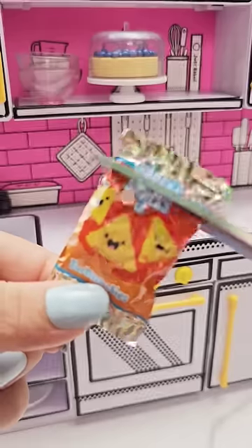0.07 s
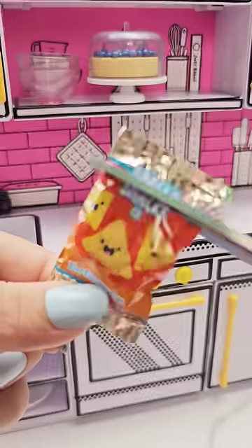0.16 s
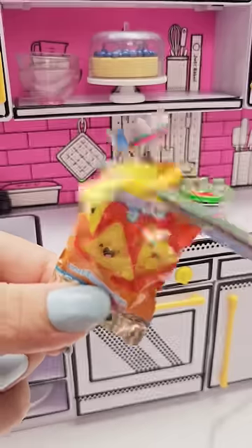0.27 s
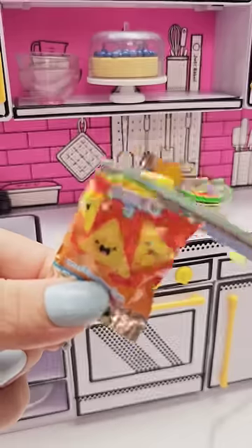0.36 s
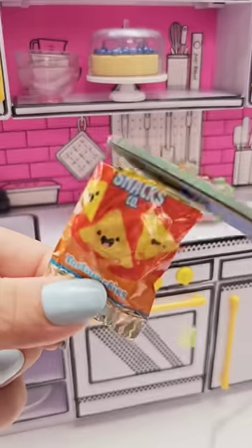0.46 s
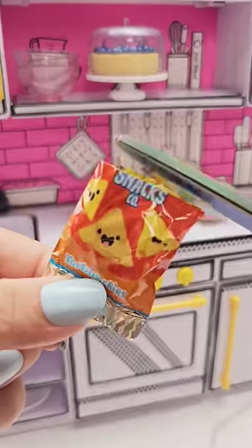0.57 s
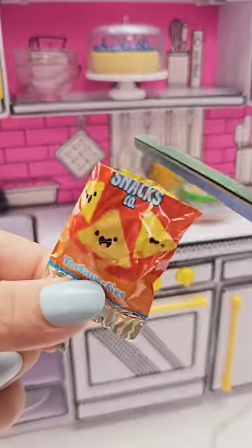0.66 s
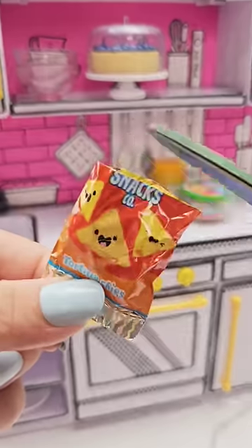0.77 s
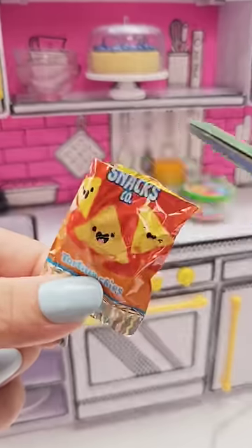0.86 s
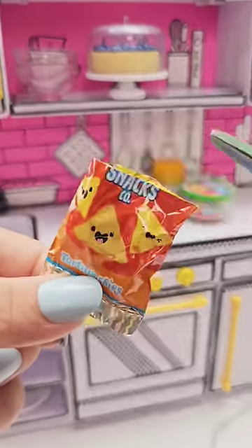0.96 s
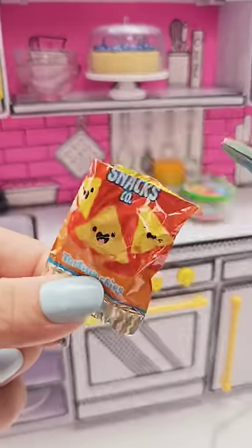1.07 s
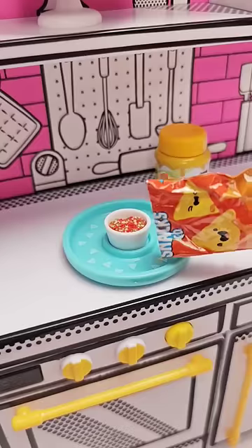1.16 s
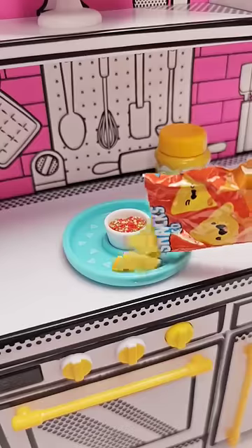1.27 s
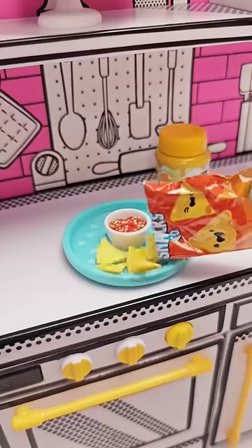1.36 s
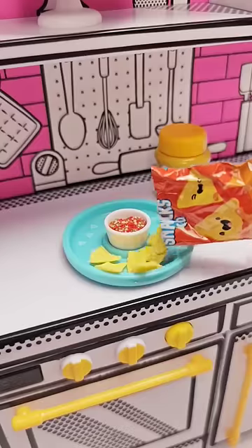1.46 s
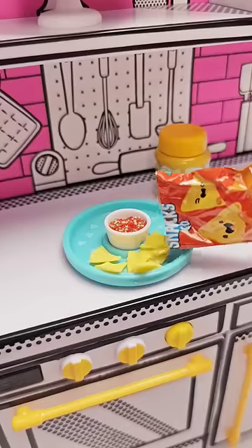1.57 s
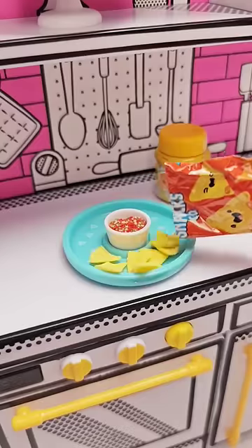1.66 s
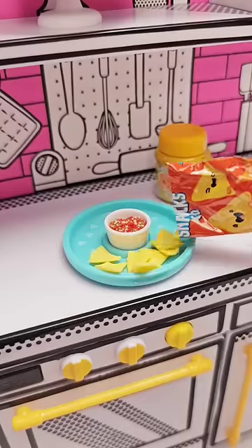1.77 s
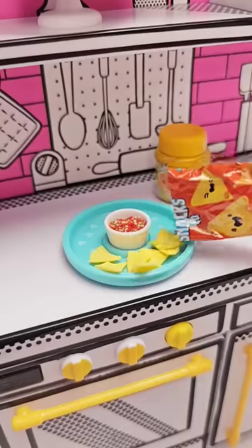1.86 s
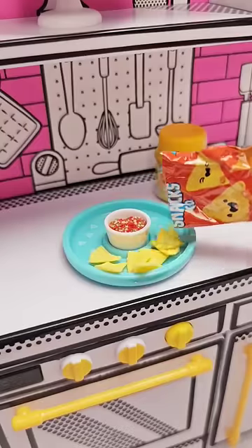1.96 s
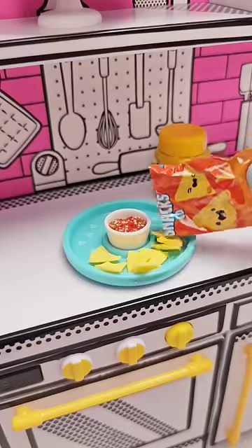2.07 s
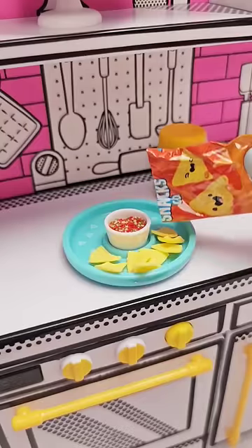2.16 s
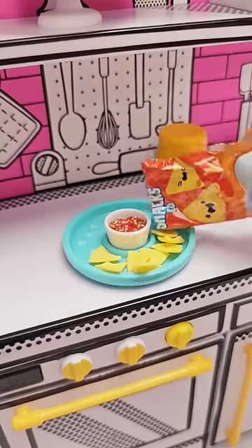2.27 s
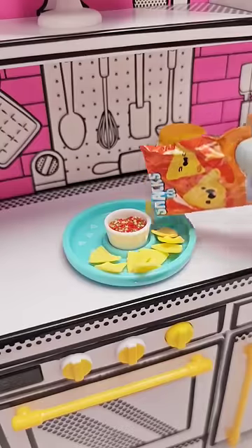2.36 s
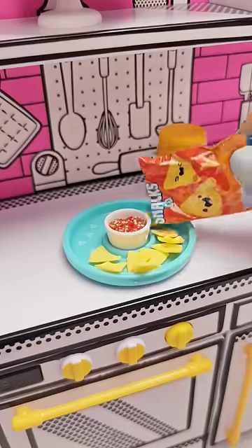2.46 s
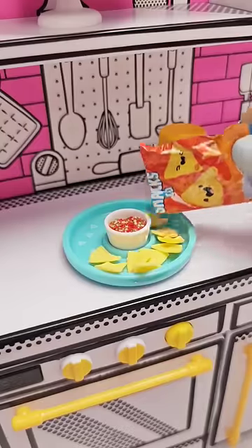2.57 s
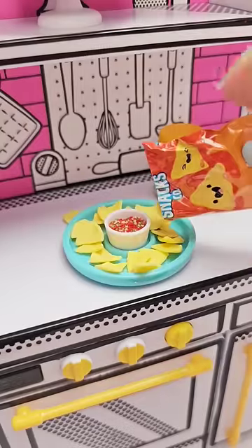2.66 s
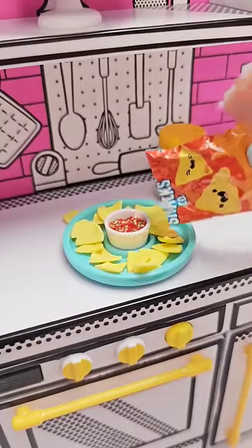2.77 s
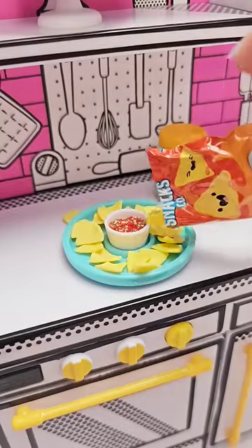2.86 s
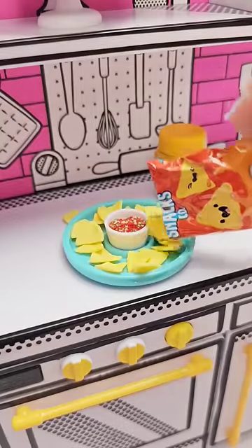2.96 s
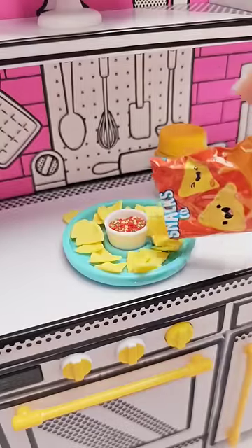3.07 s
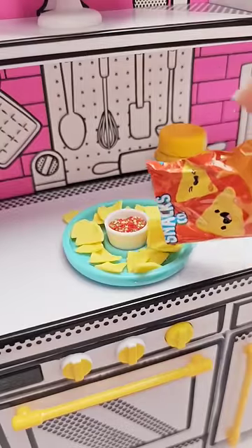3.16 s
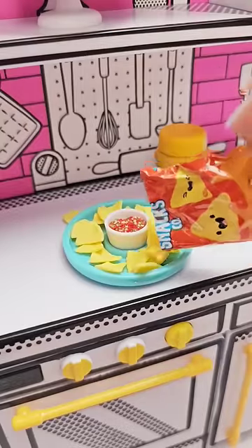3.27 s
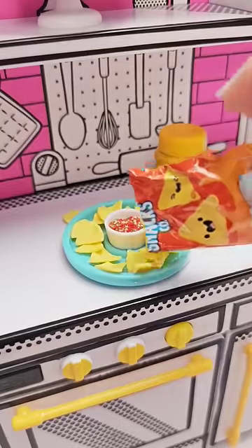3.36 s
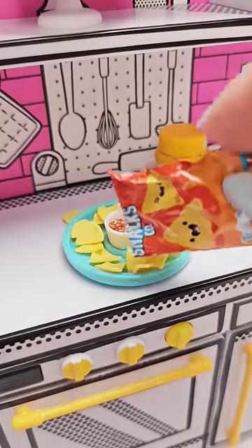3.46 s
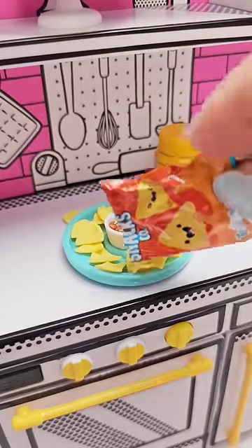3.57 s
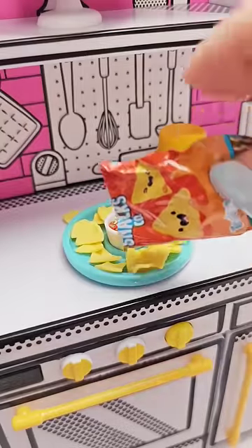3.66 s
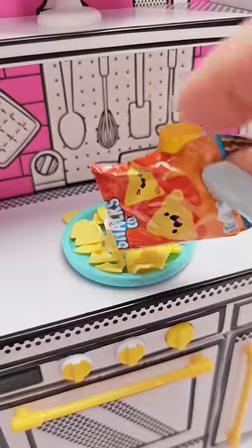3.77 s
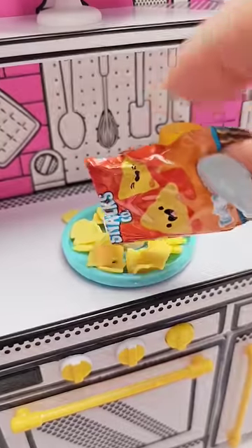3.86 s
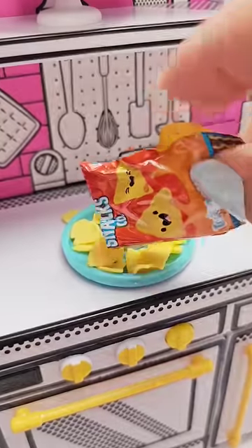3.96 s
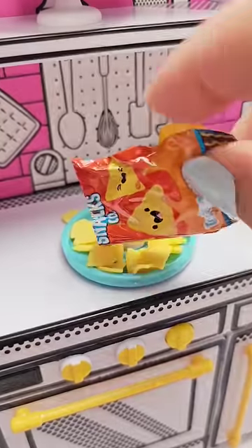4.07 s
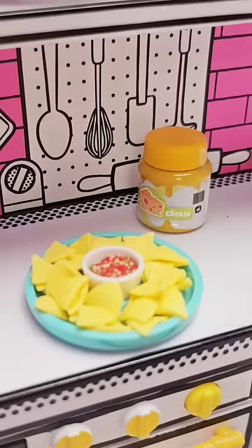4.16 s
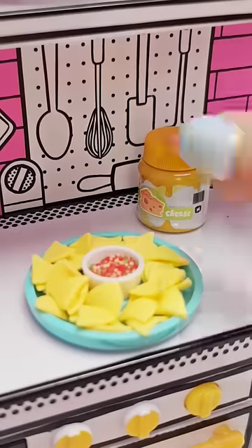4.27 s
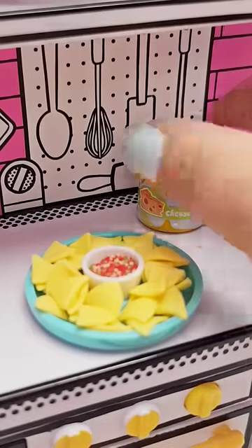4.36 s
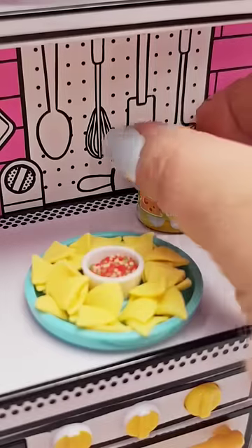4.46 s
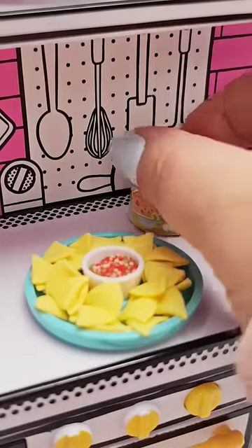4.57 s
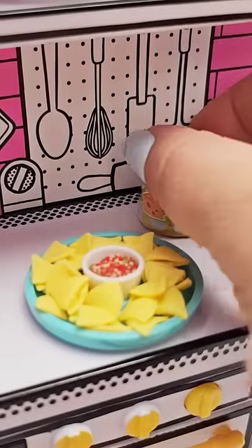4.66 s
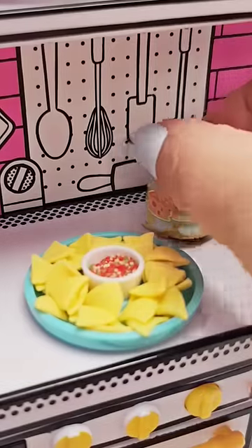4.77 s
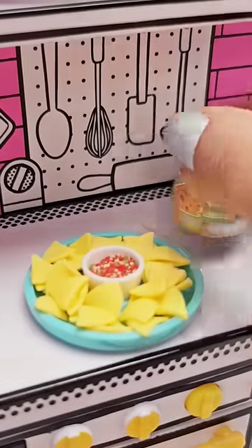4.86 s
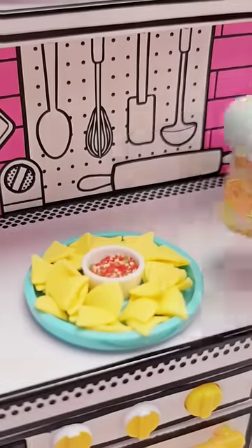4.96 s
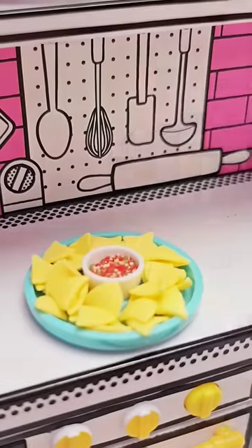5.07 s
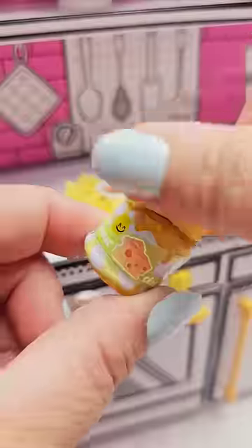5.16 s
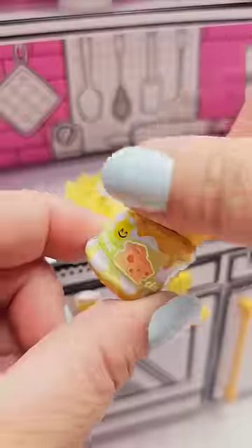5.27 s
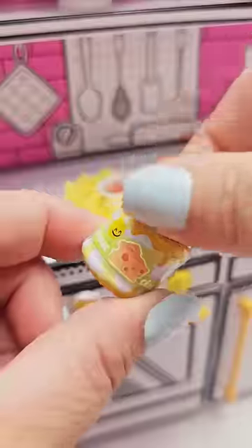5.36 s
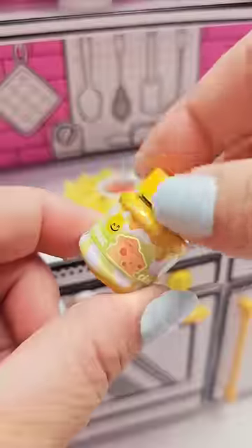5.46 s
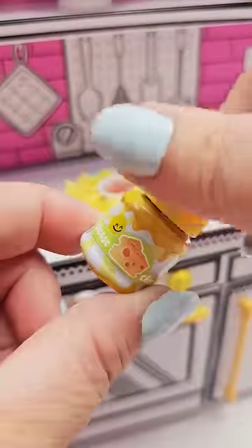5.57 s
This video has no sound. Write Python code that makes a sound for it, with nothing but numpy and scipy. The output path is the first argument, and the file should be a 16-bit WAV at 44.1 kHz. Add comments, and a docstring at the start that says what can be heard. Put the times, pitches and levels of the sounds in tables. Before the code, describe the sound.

Scissors cut through a tiny foil bag in a quick cluster of sharp, bright snaps and crinkles. After a short pause, little plastic chips drop unevenly onto a plate with soft, hollow ticks. The bag is shaken in a quick rhythm, popping and rustling as the last pieces fall. Finally a small jar knocks on a hollow toy counter. Everything is close to the microphone in a quiet room with faint ventilation.

```python
"""Scissors snip the top off a tiny foil snack bag: the seam crushes and facets of foil buckle with
sharp, ringing snaps. Shaken about six times a second, the bag pops and rustles by flexure and friction.
Little plastic chips drop onto a plate, and each impact excites the modes of a hollow toy counter.
At the end a small jar knocks on the counter. All is close to a phone in a quiet, ventilated room."""
import sys
import numpy as np
from scipy import signal
from scipy.fft import rfft, irfft, next_fast_len
from scipy.io import wavfile
from scipy.ndimage import uniform_filter1d

SR = 44100
rng = np.random.default_rng(int(sys.argv[2]) if len(sys.argv) > 2 else 0)


def to_wav(sig):
    """Store sig (one row per channel, or 1-D mono) as 16-bit WAV at the path in sys.argv[1].

    Samples outside -1..1 are clipped; the rate is SR.
    """
    pcm = np.clip(np.atleast_2d(sig), -1, 1) * 32767
    pcm = np.round(pcm).astype(np.int16)
    wavfile.write(sys.argv[1], SR, pcm.T)  # frames by channels


N = 246959
T = np.arange(SR // 5) / SR  # time axis of one impact [s]
TOP_HZ = 15750  # band limit


def amp(db):
    """Amplitude ratio of a level in decibels."""
    return 10 ** (np.asarray(db) / 20)


def unit(x):
    """Normalisation to rms 1."""
    return x / np.sqrt(np.mean(x ** 2) + 1e-20)


def along(points, hz):
    """Interpolation of (frequency, value) points on a logarithmic frequency axis."""
    f, v = np.transpose(points)
    return np.interp(np.log(hz + 1), np.log(f + 1), v)


def envelope(points):
    """Gain interpolated in decibels between (time, level) points, silent outside them."""
    times, db = np.transpose(points)
    return amp(np.interp(np.arange(N) / SR, times, db, left=-np.inf, right=-np.inf))


def strokes(rows, rise_db_per_s, fall_db_per_s):
    """Exponential growth, hold and decay of a gain for each (time, level, hold) row."""
    t, gain = np.arange(N) / SR, np.zeros(N)
    for s, db, hold in rows:
        below_db = rise_db_per_s * np.maximum(s - t, 0) + fall_db_per_s * np.maximum(t - s - hold, 0)
        gain += amp(db - np.minimum(below_db, 120))
    return gain


def filtered(x, response):
    """Linear filtering: the spectrum is multiplied by a frequency response."""
    n = x.shape[-1]
    m = next_fast_len(n + SR // 5)
    return irfft(rfft(x, m) * response(np.fft.rfftfreq(m, 1 / SR)), m)[..., :n]


def coloured(x, spectrum):
    """Spectral shaping by (frequency [Hz], level [dB]) points, at rms 1."""
    return unit(filtered(x, lambda hz: amp(along(spectrum, hz))))


def add(track, s, sound):
    """Superposition of a sound on the stereo track at time s."""
    part = track[:, max(round(s * SR), 0):][:, :len(T)]
    part += sound[..., :part.shape[1]]


def noise(apart_db, n=N):
    """Partial coherence: shared noise plus what scatters to each microphone by its own path."""
    return rng.standard_normal(n) + amp(apart_db) * rng.standard_normal((2, n))


def ring(hz, t60, phase=0):
    """Free vibration of a damped mode."""
    return np.sin(2 * np.pi * hz * T + phase) * amp(-60 * T / t60)


def burst(spectrum, t60, apart_db):
    """A sudden spray of micro-contacts sums to exponentially decaying noise."""
    return coloured(noise(apart_db, len(T)), spectrum) * amp(-60 * T / t60)


def grains(spectrum, per_s, spread_db, life_s, apart_db, colour_db):
    """Shot noise: tiny cracks of uneven size, spacing and colour add in power; rms 1."""
    onsets = np.cumsum(rng.uniform(.2, 1.8, N // 10)) * SR / per_s
    sizes = amp(spread_db * np.minimum(rng.exponential(size=len(onsets)), 2.5))
    hits = np.bincount(onsets[onsets < N].astype(int), sizes[onsets < N] ** 2, N)
    power = np.abs(signal.fftconvolve(hits, np.exp(-2 * T / life_s))[:N])
    spectra = signal.stft(np.sqrt(power) * noise(apart_db), nperseg=256)[2]
    # the resonances shift from moment to moment
    patches = uniform_filter1d(rng.standard_normal(spectra.shape[1:]), size=4, axis=0)
    patches = unit(uniform_filter1d(patches, size=4, axis=1))
    cracks = signal.istft(spectra * amp(colour_db * patches), nperseg=256)[1][:, :N]
    return coloured(cracks, spectrum)


# room air: (frequency [Hz], spectral level [dB])
AIR_SPECTRUM = [(25, -10), (50, -12.5), (120, -9), (170, -10), (280, -14), (500, -21), (1000, -26),
                (1900, -30.5), (3200, -23.5), (5000, -29), (7000, -43), (15000, -40.5)]
# likeness of the air at the two microphones: (frequency [Hz], correlation [-1..1])
AIR_CORRELATION = [(60, 0.59), (180, 0.37), (550, 0.09), (1650, -0.04), (4970, -0.72), (15000, 0.05)]
def room_air(air_db=-70.5, drone_db=-72):
    """Ambient noise: partly correlated room air and a narrow-band ventilation drone."""
    def mid_side_gains(hz):
        angle = np.arccos(np.clip(along(AIR_CORRELATION, hz), -1, 1)) / 2
        return np.array([np.cos(angle), np.sin(angle)])
    mid, side = filtered(rng.standard_normal((2, N)), mid_side_gains)
    air = coloured(np.array([mid + side, mid - side]), AIR_SPECTRUM)
    drone_band = [(60, -44), (105, -2.5), (124, 3.5), (142, -5.5), (165, -3.5), (200, -27), (500, -86.5)]
    return amp(air_db) * air + amp(drone_db) * coloured(rng.standard_normal(N), drone_band)


# decay of the room: (frequency [Hz], T60 [s])
ROOM_DECAY = [(200, .2), (1000, .18), (5000, .12), (15000, .04)]
def room(x, wet_db):
    """Reverberation: convolution with a short diffuse tail, different at each microphone."""
    hz, t, spectra = signal.stft(rng.standard_normal((2, SR // 3)), SR, nperseg=256)
    decay = amp(-60 * t / along(ROOM_DECAY, hz)[:, None])
    tail = signal.istft(spectra * decay, SR, nperseg=256)[1]
    return x + amp(wet_db) * signal.fftconvolve(x, tail / np.linalg.norm(tail[0]), axes=1)[:, :N]


# shading by the phone's body: (frequency [Hz], left minus right level [dB])
SHADING = [(200, 3.5), (550, -4), (1100, 7), (2200, 5.5), (4000, 2.5), (8000, -2), (13000, 5.5)]
def placed(x, lead_s):
    """Path difference and acoustic shadow: the left microphone leads, and each side is shaded."""
    half = lambda hz: amp(along(SHADING, hz) / 2) * np.exp(1j * np.pi * hz * lead_s)
    return filtered(x, lambda hz: np.array([half(hz), 1 / half(hz)]))


# modes of the hollow counter: (frequency [Hz], level [dB], unscaled T60 [s])
COUNTER_MODES = [(181, -23, 0.28), (291, -3.5, 0.11), (481.8, -1, 0.097), (545, -19, 0.31), (700, -21, 0.1),
                 (845, -6, 0.019), (1040, -37, 0.054), (1245, -46, 0.11)]
def counter(spot_db, t60_scale):
    """Modal superposition: the strength of each mode depends on the spot that is struck."""
    return sum(amp(db + offset_db) * ring(hz, t60 * t60_scale)
               for (hz, db, t60), offset_db in zip(COUNTER_MODES, spot_db))


# the jar touches the counter: (time [s], knock level [dB], scrape level [dB])
JAR_CONTACTS = [(4.575, -48.5, -44), (4.59, -27.5, -48), (4.644, -53, -70), (4.679, -47, -63)]
def jar(counter_db=-2, base_db=1, clack_db=-12):
    """Impact and friction: the jar scrapes, thumps and rocks twice; a fingertip slides on its lid."""
    out = np.zeros((2, N))
    friction_band = [(1000, -14), (4000, -6.5), (8000, 4.5), (15000, .5)]
    clack_band = [(300, -13), (800, 5), (1250, 7), (1800, -55), (4000, -55)]
    rise = 1 - np.exp(-T / .00048)
    for s, db, scrape_db in JAR_CONTACTS:
        base = amp(base_db) * ring(522, .021) + amp(clack_db) * burst(clack_band, .024, apart_db=-6)
        thump = base + amp(counter_db) * counter(np.zeros(len(COUNTER_MODES)), t60_scale=.72)
        scrape = burst(friction_band, .02, apart_db=15)
        add(out, s, amp(db) * thump * rise + amp(scrape_db) * scrape)
    fingertip = envelope([(4.55, -83.5), (4.58, -55), (4.61, -101),
                          (4.66, -67), (4.705, -69), (4.75, -89)])
    return out + fingertip * coloured(noise(apart_db=-4), friction_band)


# bright ticks of light contact, and the plate's dull clatter: (frequency [Hz], spectral level [dB])
TICK_SPECTRUM = [(100, -24), (350, 9), (1000, 11.5), (1900, 3.5), (2800, 10.5), (5000, 7), (7500, 11.5),
                 (11000, 3), (15000, 4)]
PLATE_SPECTRUM = [(100, -65), (200, -19), (290, 4.5), (450, -0.5), (700, -2.5), (950, -12.5), (1350, -18),
                  (2200, -30.5)]
# a chip lands: (time [s], level [dB], knock frequency [Hz], relative tick level [dB])
LANDINGS = [(1.243, -34.5, 603, -27), (1.302, -38, 586, -21), (1.312, -36, 577, -15),
            (1.322, -29.5, 590, -4), (1.35, -34.5, 596, -25), (1.365, -37, 603, 1), (1.4439, -36, 383, -4),
            (1.47, -40.5, 356, 3.5), (1.542, -35, 572, -4), (1.586, -37, 610, -4.5),
            (1.697, -34.5, 550, -7), (1.731, -44, 530, -23.5), (1.753, -46.5, 405, 6.5),
            (1.901, -45, 566, 4.5), (1.92, -48, 463, 3.5), (2.1213, -30.5, 603, -9),
            (2.321, -35.5, 540, -10), (2.394, -35.5, 398, -17), (2.406, -41.5, 340, 1.5),
            (2.477, -37.5, 353, -14), (2.514, -44.5, 295, 2), (2.523, -41, 467, 0.5),
            (2.687, -34, 355, -15), (2.808, -34, 526, -3.5), (2.853, -41.5, 737, 11),
            (2.92, -45.5, 470, -36.5), (3.047, -43, 522, 1.5), (3.175, -38.5, 613, -3),
            (3.185, -39, 554, -16), (3.349, -43.5, 452, -13), (3.846, -35.5, 363, -11),
            (3.864, -37.5, 530, -3.5), (3.88, -46.5, 313, 0)]
def chips(knock_db=4, counter_db=-12, tick_db=-4, clatter_db=-11, settle_db=-20, scratch_db=-25,
          flight_s=.014, rebound_loss_db=8, rebound_tick_db=-10, settle_t60=.31, scratch_t60=.17):
    """Inelastic impact: a chip ticks on the plate, drives the counter, rebounds and stirs the heap."""
    out, stirred, scratched = np.zeros((3, 2, N))
    rise = 1 - np.exp(-T / .0014)
    for s, db, hz, edge_db in LANDINGS:
        # a knock lasts ten cycles, so the deep ones ring longer
        knock = amp(knock_db) * ring(hz, 10 / hz)
        clatter = amp(clatter_db) * burst(PLATE_SPECTRUM, .068, apart_db=-14)
        hollow = amp(counter_db) * counter(rng.normal(0, 2.7, len(COUNTER_MODES)), t60_scale=.6)
        add(out, s + .000972, amp(db) * (knock + clatter + hollow) * rise)
        tick = burst(TICK_SPECTRUM, .018, apart_db=0)
        add(out, s + .0021, amp(db + edge_db + tick_db) * tick)
        for k, delay in enumerate(flight_s * np.cumsum(rng.uniform(.5, 1.5, size=2)), 1):
            rebound = ring(rng.uniform(450, 850), .016) * rise + amp(rebound_tick_db + edge_db) * tick
            add(out, s + delay, amp(db - rebound_loss_db * k) * rebound)
        add(stirred, s, amp(db - 60 * T / settle_t60))
        add(scratched, s, amp(db - 60 * T / scratch_t60))
    settling = grains(PLATE_SPECTRUM, per_s=160, spread_db=2.5, life_s=.003, apart_db=-8, colour_db=2)
    scratching = grains(TICK_SPECTRUM, per_s=180, spread_db=3.5, life_s=.002, apart_db=0, colour_db=3)
    return out + amp(settle_db) * stirred * settling + amp(scratch_db) * scratched * scratching


# chips sliding on foil: (frequency [Hz], spectral level [dB])
SLIDE_SPECTRUM = [(150, -11.5), (350, -11.5), (600, 2.5), (1100, -2.5), (1850, -10), (3100, 4),
                  (4500, -8.5), (7500, -7), (10500, -18), (13500, -12.5), (16000, -39)]
# the emptying bag sounds hollower: (time [s], relative cavity level [dB])
CAVITY_LEVELS = [(1.1, -19), (2.6, -15.5), (3.0, -15.5), (4.3, -8.5)]
# the bag is tipped and chips creep to its mouth: (time [s], level [dB], hold [s])
BAG_TIPS = [(1.218, -49.5, 0.1), (1.55, -69, 0.19), (1.975, -60.5, 0.019), (2.365, -65.5, 0.023),
            (2.735, -64.5, 0.034), (2.79, -54, 0.013)]
# a shake pops the bag's wall, then the chips slide:
# (time [s], pop level [dB], pop frequency [Hz], slide level [dB], slide half-width [s])
BAG_SHAKES = [(2.116, -37, 3900, -55, .007), (2.3196, -36, 3790, -42, 0.0035),
              (2.6863, -38.5, 3840, -53, 0.012), (2.83, -31.5, 3760, -39.5, 0.0073),
              (2.9962, -36.5, 3750, -39, 0.0068), (3.1562, -40, 4070, -43, 0.0094),
              (3.316, -47.5, 3220, -52, 0.011), (3.4686, -46, 3840, -43.5, 0.0058),
              (3.607, -43, 3160, -50.5, 0.011), (3.779, -41.5, 3150, -43, 0.009),
              (3.952, -33.5, 3210, -43.5, 0.0095), (4.1482, -46.5, 3170, -48, 0.0065)]
def shaking(shake_db=-1, rustle_db=-13, after_db=-21, creep_db=-4, tip_rustle_db=-3,
            slide_lag_s=.018, relax_db_per_s=395):
    """Friction excites cavity resonance as the bag is shaken or tipped; the foil rustles and relaxes."""
    t = np.arange(N) / SR
    tipping = strokes(BAG_TIPS, rise_db_per_s=694, fall_db_per_s=270)
    swell, stirred = amp(creep_db) * tipping, amp(tip_rustle_db) * tipping
    for s, _, _, db, half_width in BAG_SHAKES:
        since = t - s - slide_lag_s
        relax = (since > 0) * amp(-relax_db_per_s * np.abs(since))
        swell += amp(db) * (np.exp(-.5 * (since / half_width) ** 2) + amp(after_db) * relax)
        stirred += amp(db + rustle_db) * relax
    scrape = grains(SLIDE_SPECTRUM, per_s=800, spread_db=3, life_s=.001, apart_db=-2, colour_db=3.5)
    cavity_band = [(300, -36), (560, -12), (780, -27), (1060, 2), (1400, -6), (2000, -25), (4000, -83)]
    cavity = envelope(CAVITY_LEVELS) * coloured(noise(apart_db=-11.5), cavity_band)
    rustle = grains(TICK_SPECTRUM, per_s=200, spread_db=3.5, life_s=.002, apart_db=0, colour_db=3)
    return amp(shake_db) * swell * (scrape + cavity) + stirred * rustle


# a crack of foil: (frequency [Hz], spectral level [dB])
CRACK_SPECTRUM = [(60, -31), (250, -25.5), (600, -8), (1000, -9), (2100, -7.5), (3200, -1.5), (4800, -8.5),
                  (7500, 4), (11000, -7), (14500, -2.5), (16000, -14)]
# close modes of a foil facet: (frequency ratio [1], level [dB])
FACET_MODES = [(0.841, -12.5), (.93, 0), (1, 5), (1.078, -4.5), (1.27, -5.5), (1.95, -9)]
# the loudest sharp snaps: foil buckling, and two bright ticks of landing chips (1.4436 s, 2.3945 s):
# (time [s], level [dB], frequency [Hz], crackle T60 [s])
SHARP_SNAPS = [(.0306, -39, 4540, 0.0062), (.0524, -21, 3340, 0.017), (.0589, -13, 4660, 0.014),
               (.0873, -30, 7650, .01), (.1028, -11, 8730, 0.013), (.1128, -13, 5450, 0.0086),
               (.1343, -20.5, 8060, .022), (.1465, -21, 3920, .013), (.153, -24.5, 4260, .02),
               (.1695, -28, 9100, .016), (.1788, -22.5, 9340, .012), (.2128, -34.5, 4900, 0.0078),
               (.2878, -6, 4980, 0.015), (.2906, -2, 6996, .011), (.332, -19, 5640, 0.0061),
               (.3595, -19, 8300, 0.01), (0.3983, -29, 7340, .017), (.488, -27, 6370, 0.025),
               (.5399, -18.5, 6900, 0.014), (.5557, -17.5, 5100, 0.005), (.622, -20.5, 3050, 0.021),
               (.674, -33, 6100, .016), (0.7089, -39, 7000, .02), (.7356, -18.5, 4940, .014),
               (1.4267, -36, 2870, 0.022), (1.4436, -28.5, 6700, 0.0081), (2.371, -41, 6500, 0.012),
               (2.3945, -31.5, 6980, .013), (3.5374, -50, 3360, 0.016), (3.814, -39, 3900, 0.0079)]
def sharp_snaps(ring_db=-4, crackle_db=-6, scatter_db=-19, pop_t60=.012):
    """Impulsive excitation: buckling foil, or a chip's bright tick, clicks, rings and crackles."""
    out = np.zeros((2, N))
    pops = [(s, db, hz, pop_t60) for s, db, hz, _, _ in BAG_SHAKES]
    rise = 1 - np.exp(-T / .00028)
    for s, db, hz, t60 in SHARP_SNAPS + pops:
        phases = rng.uniform(0, 2 * np.pi, len(FACET_MODES))
        modes = sum(amp(mode_db) * ring(min(hz * ratio, TOP_HZ), t60 * .51, phase)
                    for (ratio, mode_db), phase in zip(FACET_MODES, phases))
        click = amp(2) * burst(CRACK_SPECTRUM, .004, apart_db=-3)
        crackle = amp(crackle_db) * burst(CRACK_SPECTRUM, t60, apart_db=3)
        snap = amp(db) * (click + amp(ring_db) * modes + crackle) * rise
        add(out, s + .0008, snap)
        # the fingers or blades reflect the snap, and the toy's shelves scatter it
        add(out, s + .0036, amp(-15) * snap)
        add(out, s + .0035, amp(db + scatter_db) * burst(CRACK_SPECTRUM, .028, apart_db=3))
    return out


# the seam being crushed: (frequency [Hz], spectral level [dB])
CRINKLE_SPECTRUM = [(47, -49.5), (80, -18.5), (303, -3.5), (550, -5), (802, 4), (1000, -7), (1560, 1),
                    (2180, 0), (5520, 2), (10000, -11), (12000, 0.5), (15000, -13), (16000, -18)]
# the blades bite into the seam: (time [s], level [dB], hold [s])
BITES = [(.057, -48.5, 0.0028), (.108, -37, 0.036), (.295, -33, 0.039), (.376, -38, 0.0029),
         (.546, -43.5, 0.0093), (.629, -44.5, 0.0094), (.742, -61.5, 0.0053)]
def scissors(shut_s=.29, crush_db=-1, snaps_db=-7, jolt_db=-46):
    """Acoustic emission: the blades crush the seam in cracks and small snaps, and shut with a jolt."""
    cracks = grains(CRINKLE_SPECTRUM, per_s=500, spread_db=3.5, life_s=.0014, apart_db=0, colour_db=2.5)
    snaps = grains(CRACK_SPECTRUM, per_s=130, spread_db=3, life_s=.0012, apart_db=-2, colour_db=3)
    graze = (.44, -59.5, .38)  # a long, faint stroke: the blades brush the cut edge
    pressure = strokes(BITES + [graze], rise_db_per_s=850, fall_db_per_s=380)
    out = pressure * (amp(crush_db) * cracks + amp(snaps_db) * snaps)
    jolt_band = [(30, -9), (90, -8), (170, 0), (250, -3), (450, -18), (1200, -60)]
    add(out, shut_s, amp(jolt_db) * burst(jolt_band, .16, apart_db=-12))
    return out


def scene(counter_cutoff_hz=215):
    """Superposition: the bag is cut close up, then emptied onto the counter a little further off."""
    bag = sharp_snaps() + scissors() + shaking()
    # a small body radiates no deep bass
    radiation = signal.butter(2, counter_cutoff_hz, "highpass", fs=SR, output="sos")
    knocks = signal.sosfilt(radiation, chips() + jar())
    bag, knocks = room(bag, wet_db=-19), room(knocks, wet_db=-13)
    return placed(bag, lead_s=.0002) + placed(knocks, lead_s=.0002625) + room_air()


def record(dry):
    """Soft saturation and band limiting: the phone rounds the loudest peak and cuts the top treble."""
    rounded = dry / (1 + np.abs(dry / .85) ** 6) ** (1 / 6)
    return filtered(rounded, lambda hz: 1 / np.sqrt(1 + (hz / TOP_HZ) ** 200))


dry = scene()
out = record(dry)
to_wav(out)
```